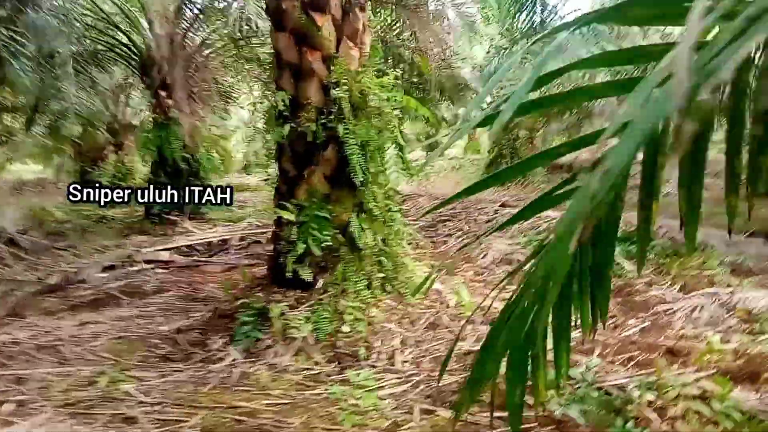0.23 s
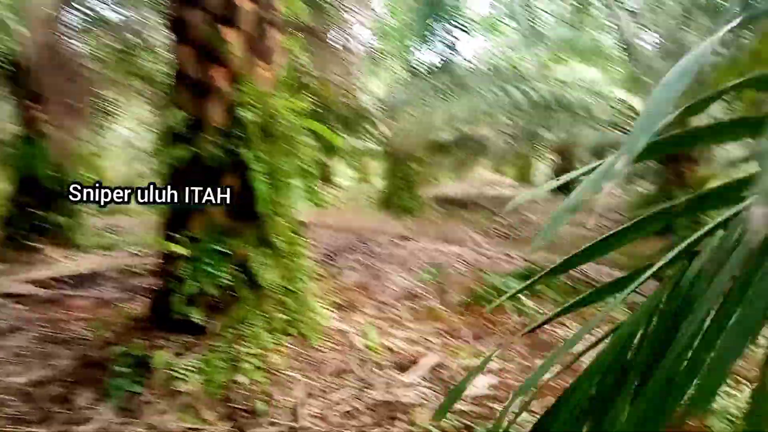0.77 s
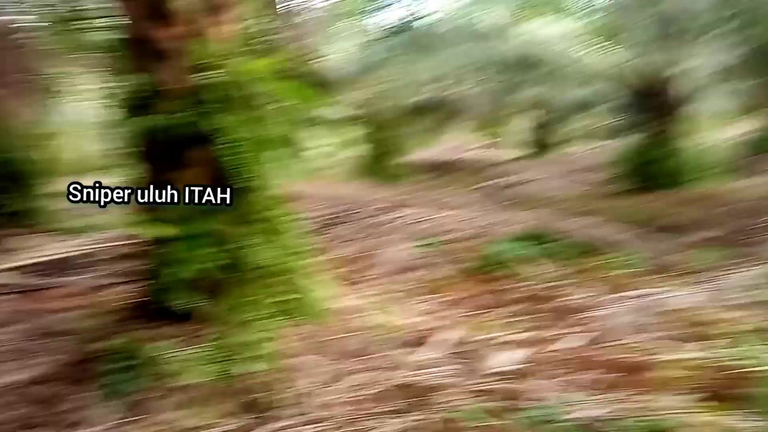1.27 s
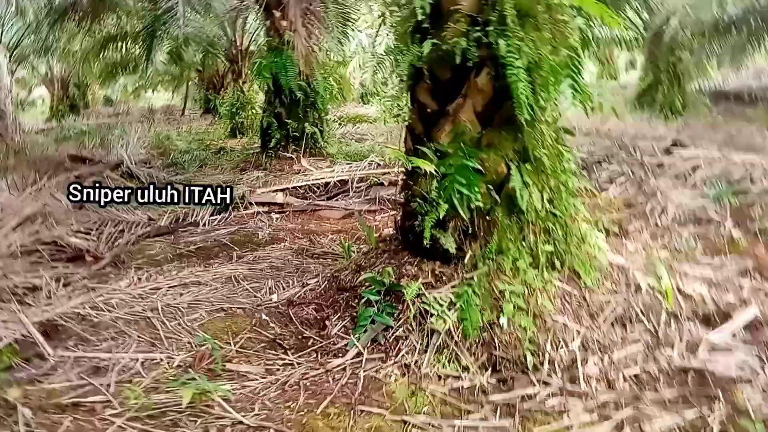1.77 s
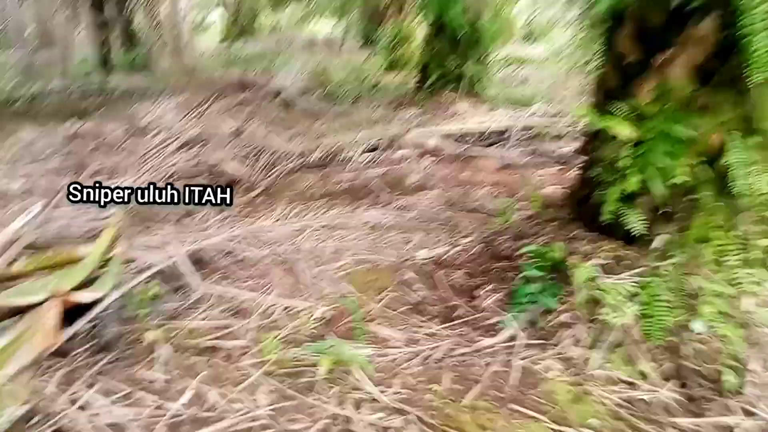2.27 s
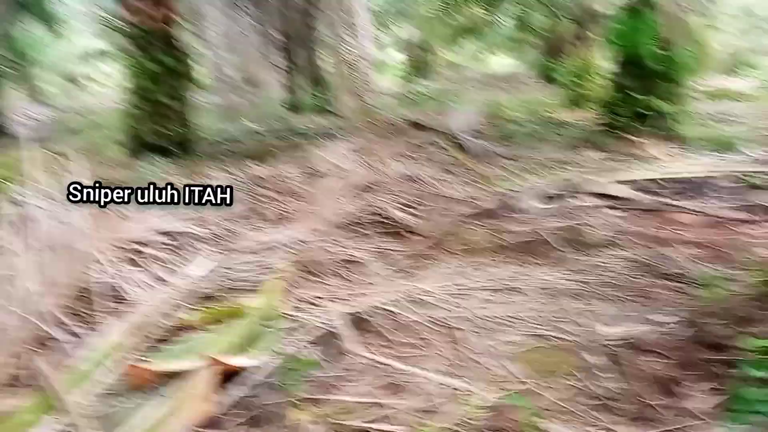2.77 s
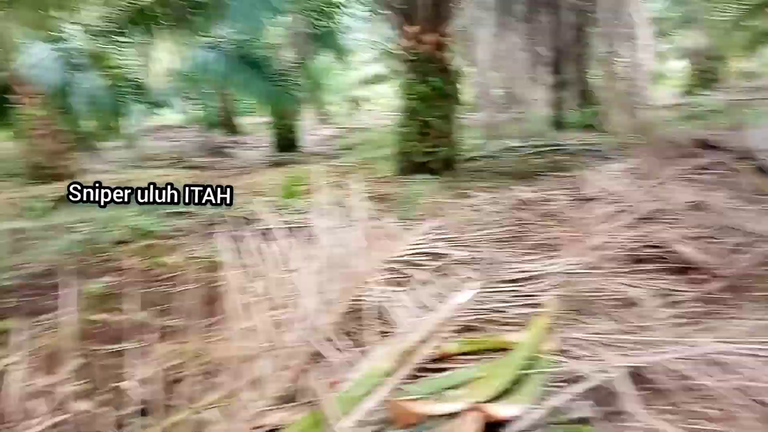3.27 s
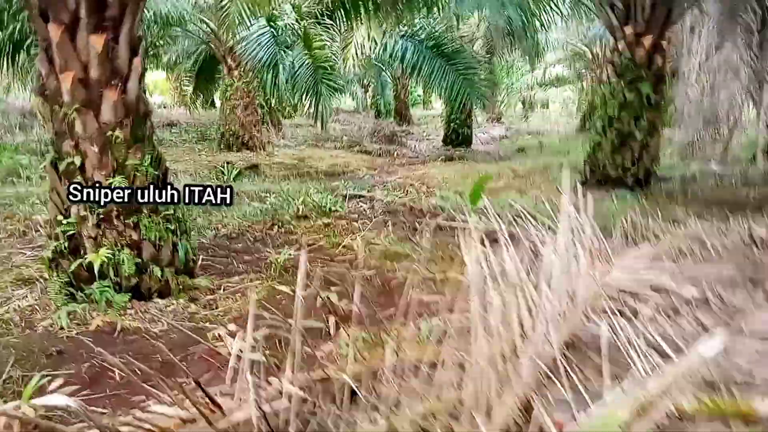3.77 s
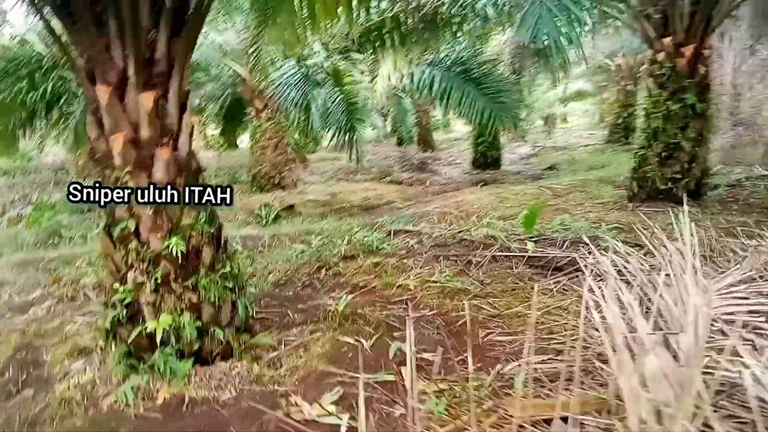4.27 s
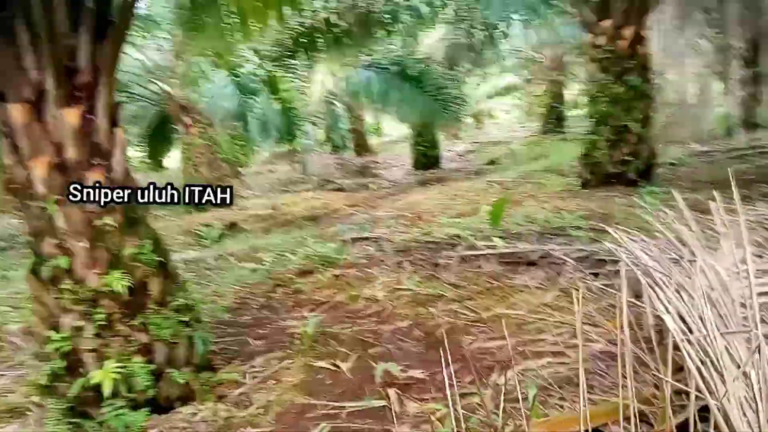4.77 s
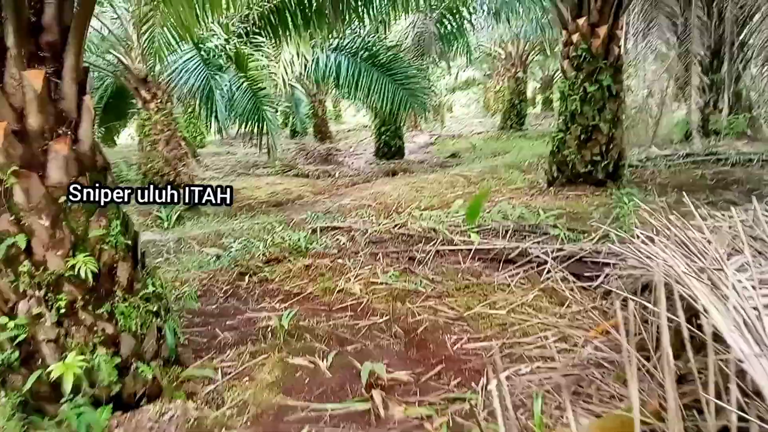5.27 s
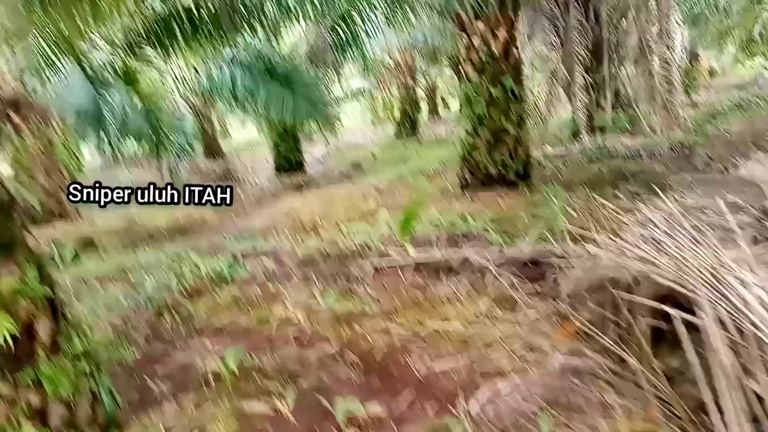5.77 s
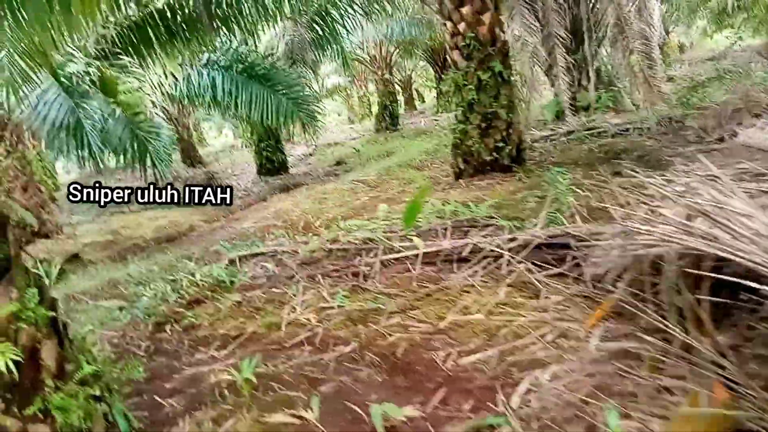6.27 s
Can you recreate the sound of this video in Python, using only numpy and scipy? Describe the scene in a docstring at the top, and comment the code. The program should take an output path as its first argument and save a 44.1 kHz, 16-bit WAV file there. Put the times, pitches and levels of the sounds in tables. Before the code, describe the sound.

Someone walks through dry fallen palm fronds, crackling and snapping in swelling bursts that grow louder, over a thin steady insect hiss.

```python
"""A dense, dry crackle swells and dies with each step of someone walking through fallen palm fronds.
Leaflets crack as random noise bursts, ribs snap with a short ring, and stalks knock as damped tones.
Behind them insects hiss steadily as narrow-band noise, a small bird gives one buzzy call of quick
downward sweeps, far birds sound as faint blurred notes, and a low hum lies under soft air noise.
The near litter carries a faint echo from the grove; one phone microphone picks up the whole."""
import sys
import numpy as np
from scipy import signal
from scipy.fft import rfft, irfft
from scipy.io import wavfile

SR = 44100
rng = np.random.default_rng(int(sys.argv[2]) if len(sys.argv) > 2 else 0)


def generate_wav(signal):
    """Clip the signal to [-1, 1] and save it as 16-bit WAV at the path in sys.argv[1]."""
    frames = np.transpose(np.atleast_2d(signal))
    scaled = np.clip(frames, -1, 1) * 32767
    pcm = np.round(scaled).astype(np.int16)
    wavfile.write(sys.argv[1], SR, pcm)


N = 287308
TIME = np.arange(N) / SR
TOP_HZ = 15850  # upper edge of the microphone's range

# Colour of dry leaf cracking close by, as the phone microphone picks it up: frequency_hz, level_db
PICKED_UP_COLOUR = [(60, -32), (125, -10), (200, -10.5), (330, -4.5), (1400, -6.5), (4100, 0), (5100, -2.5),
                    (6500, 2), (7950, -4), (9400, 3), (12200, -6), (13800, -8.5), (14800, 8), (16000, -7)]


def undb(db):
    """Convert decibels to an amplitude ratio."""
    return 10 ** (np.asarray(db) / 20)


def unit(x):
    """Normalise to an rms amplitude of 1."""
    return x / np.sqrt(np.mean(x ** 2) + 1e-20)


def blow(x, db):
    """Equal-energy scaling: give a short sound the energy of 10 ms at the given rms level."""
    return x * undb(db) * np.sqrt(.01 * SR / np.sum(x ** 2))


def band(x, lo_hz, hi_hz, order=2):
    """Causal Butterworth band-pass: keep the part of the spectrum between two frequencies."""
    edges_hz = [lo_hz, min(hi_hz, SR / 2 - 10)]
    return signal.sosfilt(signal.butter(order, edges_hz, "band", fs=SR, output="sos"), x)


def colour(x, points, size=2048):
    """Minimum-phase filter through (Hz, dB) points: folding the cepstrum makes it causal."""
    hz, db = np.transpose(points)
    bins_hz = np.maximum(np.fft.rfftfreq(size, 1 / SR), 1)
    gain_db = np.interp(np.log(bins_hz), np.log(hz), db)
    cepstrum = irfft(np.log(undb(gain_db)))
    cepstrum[1:size // 2] *= 2
    cepstrum[size // 2 + 1:] = 0
    impulse = irfft(np.exp(rfft(cepstrum)))
    return signal.fftconvolve(x, impulse)[:len(x)]


def fade(t, t60):
    """Exponential damping: amplitude falls by 60 dB in t60 seconds."""
    return np.exp(-np.log(1000) * t / max(t60, 1e-4))


def linger(energy, t60):
    """Energy decay: each burst dies away exponentially; scaled from energy of mean 1."""
    keep = fade(1 / SR, t60) ** 2
    return signal.lfilter([1 - keep], [1, -keep], energy / energy.mean())


def walk(rate):
    """Random modulation: straight lines between normal values, rate per second, rms 1."""
    knots = rng.standard_normal(4096)
    return unit(np.interp(TIME * rate, np.arange(len(knots)), knots))


def add(track, s, sound):
    """Superposition: mix a sound into a track from time s in seconds."""
    start = int(np.clip(s * SR, 0, N - 1))
    track[start:start + len(sound)] += sound[:N - start]


def air(db=-70, waver_db=3.2):
    """Broadband noise with a falling spectrum: a low distant hum under soft air noise."""
    # Spectrum of distant hum and air: frequency_hz, level_db
    air_colour = [(25, 6.5), (80, -5.5), (128, 0), (190, -11), (400, -16), (900, -23), (4000, -25),
                  (13500, -32), (15200, -31)]
    noise = colour(rng.standard_normal(N), air_colour)
    return unit(noise) * undb(db + waver_db * walk(2.08))


def insects(db=-57.0, throb_db=1.1, swell_db=-1.5):
    """Incoherent summation: many far insects blend into one narrow, restless band of noise."""
    # Spectrum of the insect chorus: frequency_hz, level_db
    chorus_colour = [(6800, -59), (7700, -17), (8000, -49), (8500, -11.5), (9000, -1), (9450, -5.5),
                     (10050, -13.5), (10500, -49), (12000, -57)]
    hiss = unit(colour(rng.standard_normal(N), chorus_colour))
    return hiss * undb(db + throb_db * walk(160) + swell_db * walk(4.2))


def far_birds(width=0.064):
    """Multipath blurring: many paths through the trees widen each distant note into narrow-band noise."""
    # Thin whistles and a low coo: centre_s, level_db, pitch_hz, half_length_ms
    far_notes = [(.86, -81, 5460, 65), (.93, -87, 3200, 61), (1.6, -68, 2880, 42), (1.69, -78, 2760, 34),
                 (2.475, -65, 327, 61)]
    out = np.zeros(N)
    for centre_s, db, hz, half_ms in far_notes:
        tone = unit(band(rng.standard_normal(N), hz / (1 + width), hz * (1 + width)))
        swell = np.exp(-(1000 * (TIME - centre_s) / half_ms) ** 2)
        out += undb(db) * tone * swell
    return out


def bird(centre_s=1.0, half_length_s=0.053, db=-61, rate=120, hz=5050, sweep_hz=1200, jitter=0.136):
    """Frequency modulation: quick, uneven downward sweeps make a buzz that swells and fades."""
    phase = np.cumsum(rate * (1 + jitter * walk(102))) / SR % 1
    pitch_hz = hz + sweep_hz * (.5 - phase)
    sweeps = np.sin(2 * np.pi * np.cumsum(pitch_hz) / SR) * np.sin(np.pi * phase) ** 2
    swell = np.exp(-((TIME - centre_s) / half_length_s) ** 2)
    return unit(sweeps) * undb(db) * swell


def tread():
    """Load envelope: presses build, hold and settle, adding in power; returns level, bass, treble in dB."""
    # Feet or legs pressing into the litter:
    # start_s, attack_s, hold_s, crackle_level_db, extra_bass_db, extra_treble_db
    presses = [(0.203, 0.02, 0.016, -61, 5, 1), (0.347, 0.062, 0.013, -53, -13, -3.5),
               (0.47, 0.011, 0.17, -62, 2, -4), (0.997, 0.037, 0.13, -57.5, 4, -1),
               (1.151, 0.021, 0.021, -50, -4.5, 0.5), (1.262, 0.035, 0.042, -49, 1, -5),
               (1.693, 0.028, .01, -55.5, 1, -1), (1.737, 0.013, .01, -41.5, -12.5, -2.5),
               (1.848, 0.045, 0.025, -36.5, -4.5, -3.5), (1.967, 0.063, 0.055, -38, -4.5, -2.5),
               (2.203, 0.032, 0.12, -46.5, -10, -3.5), (2.34, 0.014, 0.01, -46.5, -8, -7),
               (2.627, 0.079, 0.088, -35, -2.5, -6), (2.938, 0.038, 0.022, -47, -1, -14.5),
               (3.3, .02, 0.046, -59.5, -11, -7), (3.407, 0.074, .05, -46, -6.5, -11),
               (3.477, 0.074, 0.022, -35, -5, -18), (3.644, 0.057, 0.021, -30, -3, -9.5),
               (4.101, 0.081, 0.11, -41.5, -2.5, -1.5), (4.337, 0.018, 0.043, -35.5, -1.5, -20),
               (4.431, 0.051, 0.12, -41.5, -1, -5), (4.638, .03, 0.11, -41, 1, -6),
               (4.903, 0.1, 0.11, -45.5, 2, -5), (5.069, 0.089, 0.07, -35.5, -4, -1.5),
               (5.284, 0.13, 0.31, -33, 4, -6.5), (5.816, 0.047, 0.011, -33, -1, -8.5),
               (5.947, .04, 0.086, -34.5, 2.5, -7.5), (6.15, 0.084, 0.12, -32, -4, -5),
               (6.323, .05, 0.24, -33.5, 1, -4.5)]
    load_power = 0.89  # crackle amplitude grows with this power of the weight put down
    # the heap falls quiet sooner than the loose blades on top
    settle_db_per_s, bass_settle_db_per_s = 98.5, 123
    t = np.linspace(0, N / SR, 4096)
    middle, bass, treble = np.full((3, len(t)), undb(-95.5) ** 2)  # faint floor
    for start, attack, hold, db, bass_db, treble_db in presses:
        weight = np.clip((t - start) / max(attack, 1e-3), 0, 1) ** load_power
        resting_s = np.maximum(t - start - attack - hold, 0)
        power = (weight * undb(db - settle_db_per_s * resting_s)) ** 2
        bass_power = (weight * undb(db + bass_db - bass_settle_db_per_s * resting_s)) ** 2
        middle = middle + power
        treble = treble + power * undb(treble_db) ** 2
        bass = bass + bass_power
    powers = (middle, bass / middle, treble / middle)
    return [np.interp(TIME, t, 10 * np.log10(p)) for p in powers]


def taps(level_db, bass_db, db=-12.5, spread_db=4.0, low_hz=620, octaves=2.6, bass_share=0.72,
         cycles=12, count=300):
    """Damped resonance: hollow leaf stems tap together, each with a brief woody pitch of its own."""
    out, t = np.zeros(N), TIME[:2048]
    for when, size, pitch in rng.random((count, 3)):
        i = int(when * N)
        load_db = level_db[i] + bass_share * bass_db[i]
        size_db = spread_db * min(-np.log(1 - size), 3)
        hz = low_hz * 2 ** (octaves * pitch)
        burst = rng.standard_normal(len(t)) * fade(t, cycles / hz)
        ring = band(burst, hz / 1.1, hz * 1.1, order=1)
        add(out, when * N / SR, blow(ring, db + load_db + size_db))
    return out


def ticks(level_db, db=-14, spread_db=2.0, t60=0.0082, follow=0.78, ring_hz=6500, lag_s=0.015, count=260):
    """Elastic release: single leaflets flick and split, springing back a moment after the load has gone."""
    out, t = np.zeros(N), TIME[:1024]
    for when, size, pitch in rng.random((count, 3)):
        s = when * N / SR
        # the larger of the load now and the load a moment ago
        load_db = np.interp([s, s - lag_s], TIME, level_db).max()
        size_db = spread_db * min(-np.log(1 - size), 3)
        hz = ring_hz * 2 ** (2 * pitch - 1)
        burst = colour(rng.standard_normal(len(t)) * fade(t, t60), PICKED_UP_COLOUR)
        tick = band(burst, hz / 2, hz * 2, order=1)
        add(out, s, blow(tick, db + follow * load_db + size_db))
    return out


def crackle(level_db, bass_db, treble_db, rate=700, spread_db=4.5, largest=3.07, own_db=4.0,
            t60=0.0081, tail_t60=0.1, tail_db=-3, rub_db=-8, flutter_db=0.77,
            wander_db=2.0, wander_rate=24, bass_hz=900, body_hz=2600, count=30):
    """Random impulse noise: leaflets crack, each with its own size and colour, over blades rubbing."""
    cracks = np.flatnonzero(rng.random(N) < rate / SR)  # rate in cracks per second
    size_db = spread_db * np.minimum(rng.exponential(size=N), largest)[cracks]
    edges_hz = np.geomspace(100, 17000, count + 1)
    leaves = np.zeros(N)
    for lo, hi in zip(edges_hz, edges_hz[1:]):
        # every crack frees a short burst, stronger in some bands than in others
        energy = np.zeros(N)
        energy[cracks] = undb(size_db + own_db * rng.standard_normal(N)[cracks]) ** 2
        # the blade rattles on after the burst
        rattle = undb(tail_db) ** 2 * linger(energy, tail_t60)
        power = linger(energy, t60) + rattle + undb(rub_db) ** 2
        grains = band(np.sqrt(power) * rng.standard_normal(N), lo, hi)
        # weight on the heap brings out the bass; thin tips brushing by bring out the treble
        bass = np.interp(np.log(hi), np.log([bass_hz, body_hz]), [1, 0])
        treble = np.interp(hi, [7500, 13000], [0, 1])
        # the resonances shift as one frond after another takes the load
        shift_db = wander_db * walk(wander_rate)
        leaves += grains * undb(bass * bass_db + treble * treble_db + shift_db)
    leaves = colour(leaves, PICKED_UP_COLOUR)
    middle = np.std(band(leaves, 1800, 7500, order=4))  # the middle band sets the reference level
    return leaves / middle * undb(level_db + flutter_db * walk(70))


def snaps(ring_t60=0.0067, ring_attack_t60=0.00028, ring_db=-9, fibre_db=3, fibre_rate=2200,
          focus_db=-4, tail_db=-32, tail_t60=0.16, gain_db=-1.5):
    """Brittle fracture: a rib gives way with a brief ring, its fibres tear, and the frond shivers on."""
    # Frond ribs breaking: start_s, level_db (before gain_db), ring_hz, tear_t60_ms
    rib_breaks = [(0.401, -41.5, 6660, 23), (1.026, -52, 8000, 8), (1.0585, -42, 3700, 25),
                  (1.76, -34, 7300, 21), (1.828, -29.5, 6550, 62), (1.8549, -30.5, 4900, 20),
                  (1.904, -26.5, 8900, 40), (1.9662, -24.5, 9400, 6.4), (2.119, -29, 9000, 2.8),
                  (2.166, -36, 4070, 28), (2.1903, -27, 10000, 2.4), (2.3075, -34, 7400, 9.8),
                  (2.3886, -32.5, 7250, 20), (2.6262, -38, 9300, 6), (2.7887, -21, 6260, 18),
                  (2.8662, -32, 7350, 9.6), (2.8877, -28, 7040, 9.1), (3.2952, -35.5, 6600, 8.4),
                  (3.4122, -34, 8600, 26), (3.565, -30, 3930, 6.1), (3.5963, -30.5, 8800, 5.3),
                  (3.703, -25.5, 4000, 19), (3.7825, -28, 2973, 19), (3.914, -39, 6900, 10),
                  (4.1106, -37, 4600, 18), (4.141, -32.5, 6400, 18), (4.2968, -30.5, 5800, 24),
                  (4.3916, -28.5, 3620, 17), (4.416, -29.5, 5460, 15), (4.5572, -28.5, 9400, 22),
                  (4.6956, -31.5, 2780, 16), (4.8024, -22, 2960, 25), (4.807, -25.5, 4400, 260),
                  (5.037, -31, 5600, 35), (5.072, -34, 10400, 5.7), (5.2015, -34, 6900, 13),
                  (5.2393, -26.5, 6200, 48), (5.3853, -25, 3470, 13), (5.5067, -20.5, 4180, 20),
                  (5.546, -26, 4530, 9.8), (5.5576, -21.5, 4630, 8.3), (5.581, -27.5, 4200, 10),
                  (5.608, -22, 6570, 32), (5.667, -25, 9700, 18), (5.8137, -25, 7600, 34),
                  (5.978, -26, 3770, 16), (6.135, -24.5, 7260, 20), (6.384, -26.5, 6740, 22)]
    out, t = np.zeros(N), TIME[:4096]
    for s, db, hz, tear_ms in rib_breaks:
        noise, chance = rng.standard_normal((2, len(t)))
        fibres = undb(fibre_db * np.interp(t * fibre_rate, np.arange(len(t)), chance))
        decay = fade(t, tear_ms / 1000) + undb(tail_db) * fade(t, tail_t60)
        tear = colour(noise * fibres * decay, PICKED_UP_COLOUR)
        # thin ribs ring high and give little bass
        wide = unit(band(tear, hz / 4, TOP_HZ, order=1))
        focus = unit(band(tear, hz / 1.44, hz * 1.16, order=1))
        tear = wide + undb(focus_db) * focus
        ring = np.sin(2 * np.pi * hz * t) * fade(t, ring_t60) * (1 - fade(t, ring_attack_t60))
        add(out, s, blow(unit(tear) + undb(ring_db) * unit(ring), db + gain_db))
    return out


def knocks(cycles=6, scuff_db=-5, scuff_t60=0.046, low_cut=0.57, layers=4):
    """Heavy damping: soil stills a struck stalk within a few cycles, and a dull scuff follows."""
    # Soles and thick stalks striking the ground: start_s, level_db, pitch_hz
    strikes = [(.24, -58.5, 630), (0.508, -53.5, 445), (.63, -61, 1210), (1.088, -55, 586),
               (1.318, -49.5, 610), (2.039, -48.5, 536), (2.15, -41.5, 617), (2.372, -48.5, 1020),
               (2.68, -39.5, 464), (3.415, -48.5, 540), (3.575, -37.5, 1320), (3.847, -49, 254),
               (4.146, -44, 860), (4.739, -37.5, 834), (4.787, -42, 370), (5.134, -40.5, 590),
               (5.224, -42, 400), (5.442, -39, 397), (5.511, -32, 443), (5.669, -33, 620),
               (5.707, -35.5, 613), (5.88, -35, 447), (5.977, -34.5, 640), (6.419, -37.5, 470),
               (6.491, -39.5, 549)]
    # Heavy footfalls sinking through the heap:
    # start_s, level_db, first_pitch_hz, pitch_drop_octaves (per layer)
    stamps = [(4.351, -28.5, 500, 0.093), (5.457, -29.5, 384, 0.43)]
    layer_gap_s, layer_loss_db = .009, 4  # each deeper layer is struck later and more softly
    sinking = [(s + k * layer_gap_s, db - k * layer_loss_db, hz / 2 ** (k * drop))
               for s, db, hz, drop in stamps for k in range(layers)]
    out, t = np.zeros(N), TIME[:4096]
    for s, db, hz in strikes + sinking:
        thud = band(-np.sin(2 * np.pi * hz * t) * fade(t, cycles / hz), hz * low_cut, 3400)
        scuff = band(rng.standard_normal(len(t)) * fade(t, scuff_t60), hz / 2.55, hz * 1.5)
        add(out, s, blow(unit(thud) + undb(scuff_db) * unit(scuff), db))
    return out


def grove(x, db=-30, t60=0.21, build_t60=0.27):
    """Diffuse scattering: trunks and crowns return a faint, short echo that builds up and decays."""
    t = TIME[:SR // 2]
    scattered = band(rng.standard_normal(len(t)), 200, 8000, order=1)
    echo = scattered * fade(t, t60) * (1 - fade(t, build_t60))
    echo = echo / np.sqrt(np.sum(echo ** 2))
    return x + undb(db) * signal.fftconvolve(x, echo)[:N]


def scene():
    """Superposition of steps close by and life in the crowns, the same in both channels."""
    level_db, bass_db, treble_db = tread()
    litter = crackle(level_db, bass_db, treble_db) + ticks(level_db) + taps(level_db, bass_db)
    near = grove(litter + snaps() + knocks())
    mono = near + insects() + bird() + far_birds() + air()
    return np.array([mono, mono])


def record(dry):
    """Saturation and band limiting: the phone rounds sharp cracks, thins deep bass and cuts the top."""
    rounded = dry / (1 + (dry / .42) ** 4) ** .25
    thinned = signal.sosfilt(signal.butter(2, 80, "high", fs=SR, output="sos"), rounded)
    top_cut = signal.ellip(10, .2, 80, TOP_HZ, fs=SR, output="sos")
    return signal.sosfilt(top_cut, thinned)


dry = scene()
out = record(dry)
generate_wav(out)
```